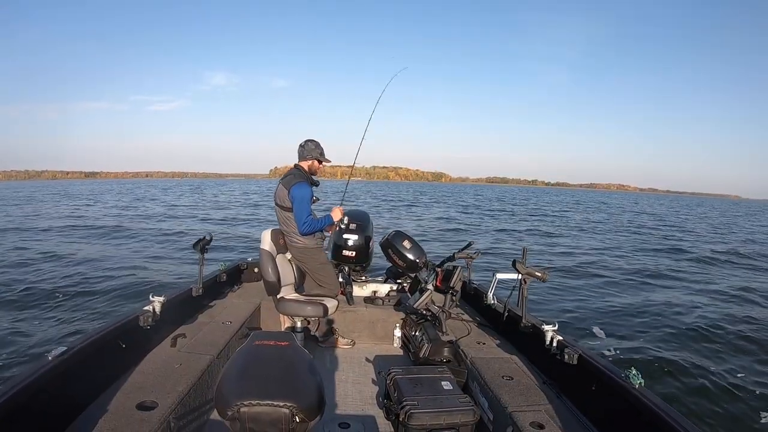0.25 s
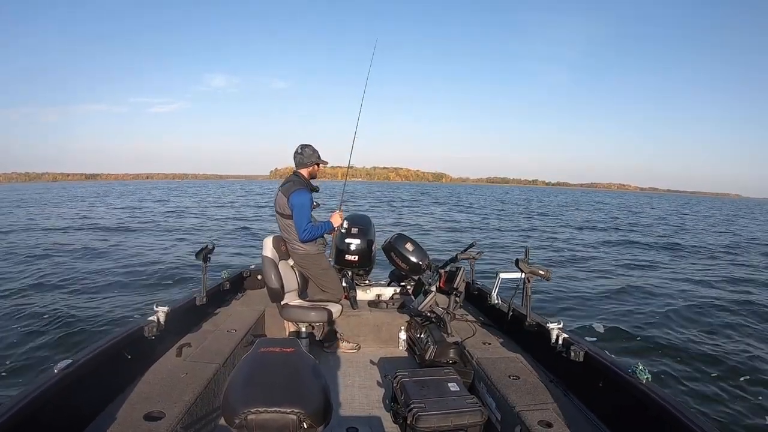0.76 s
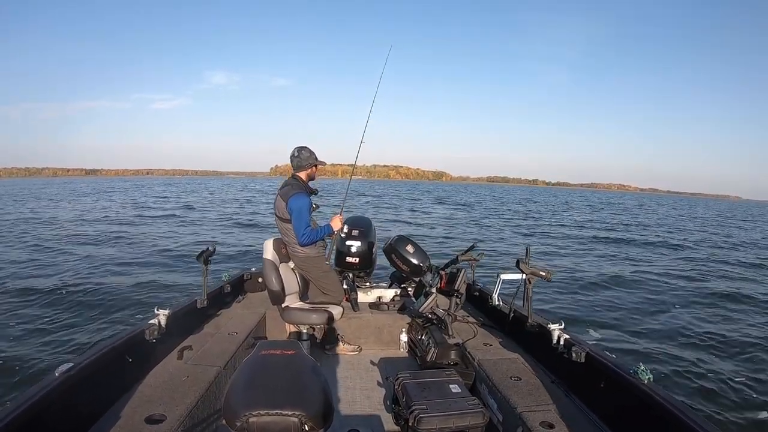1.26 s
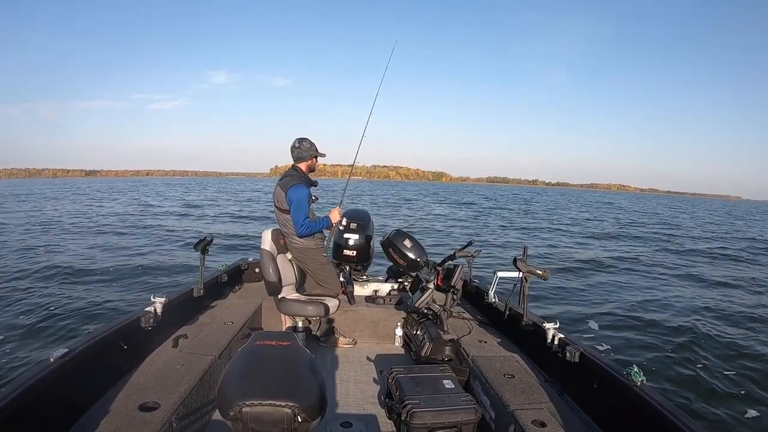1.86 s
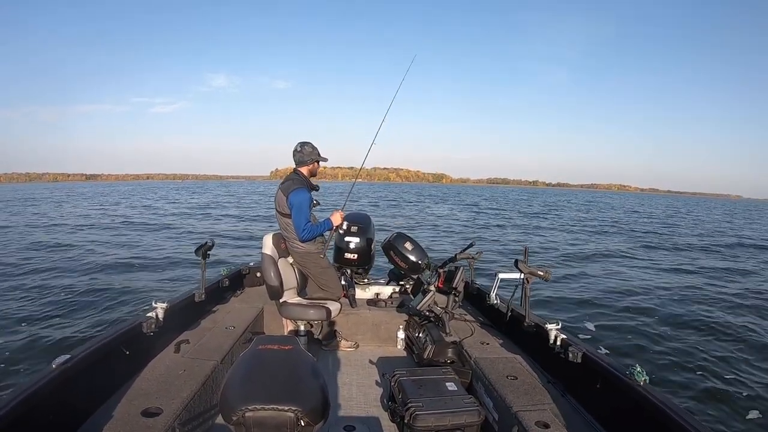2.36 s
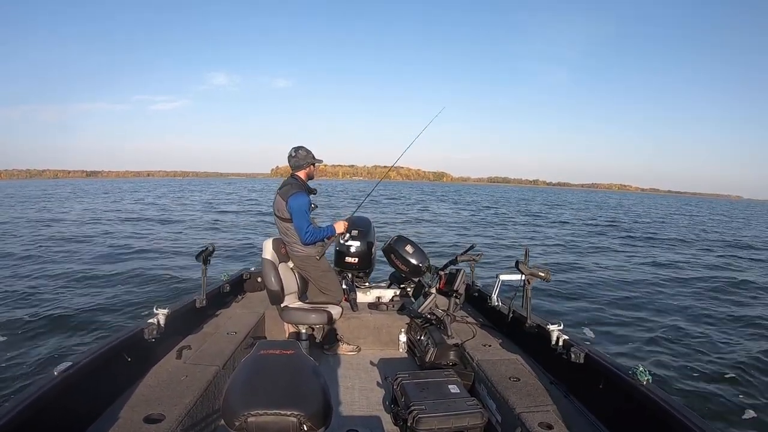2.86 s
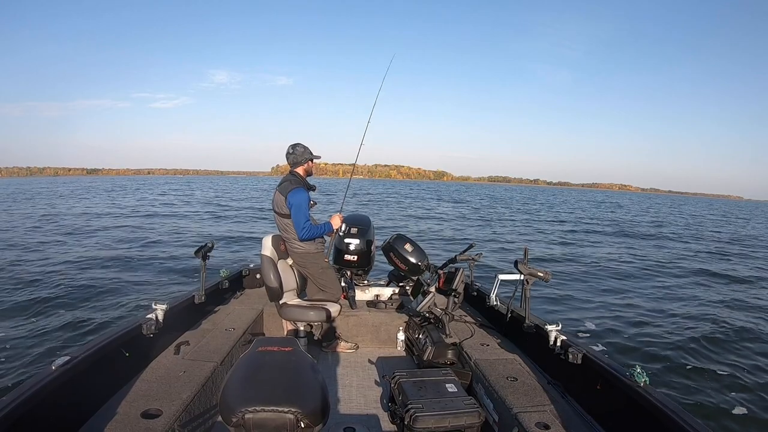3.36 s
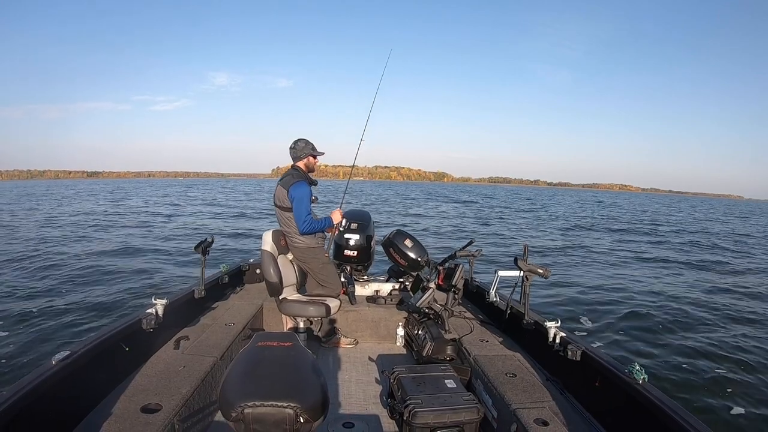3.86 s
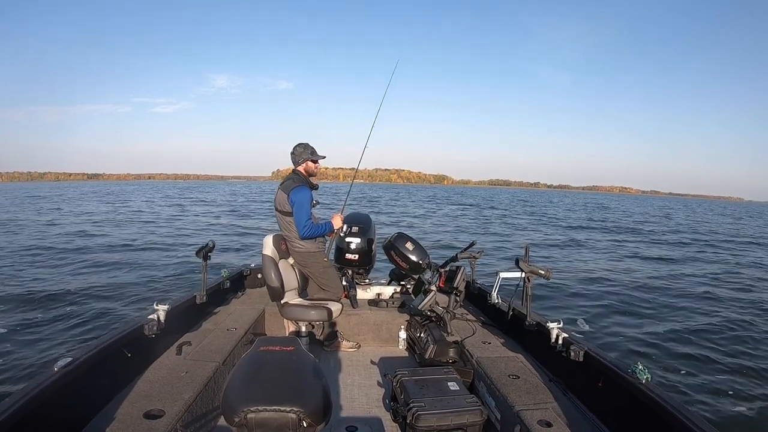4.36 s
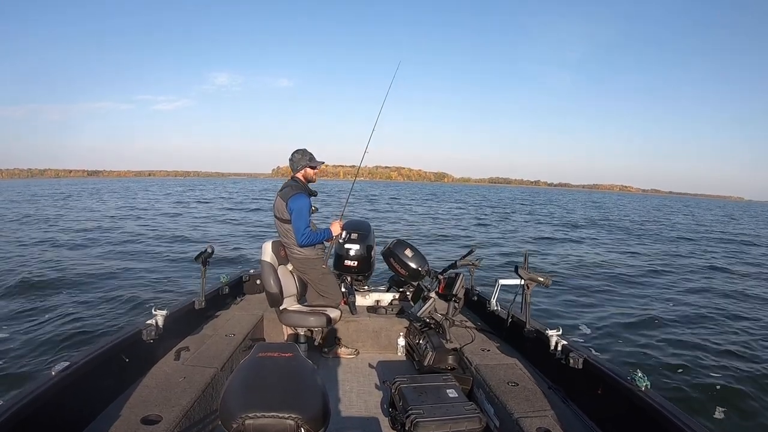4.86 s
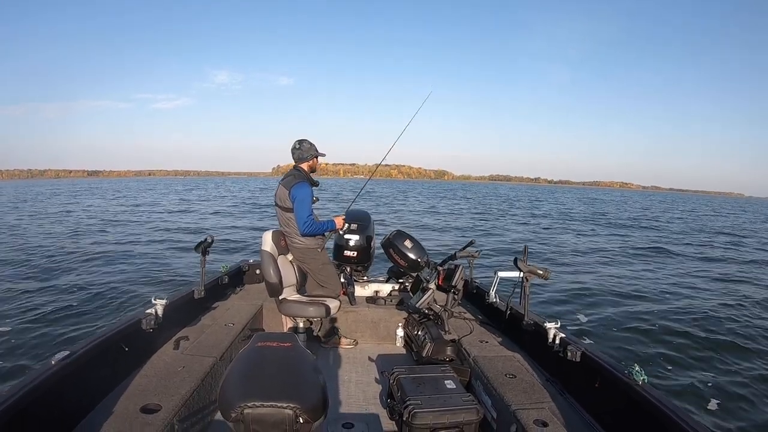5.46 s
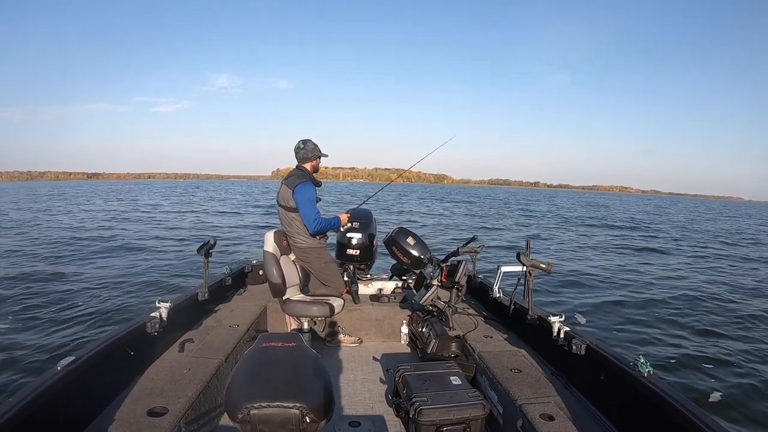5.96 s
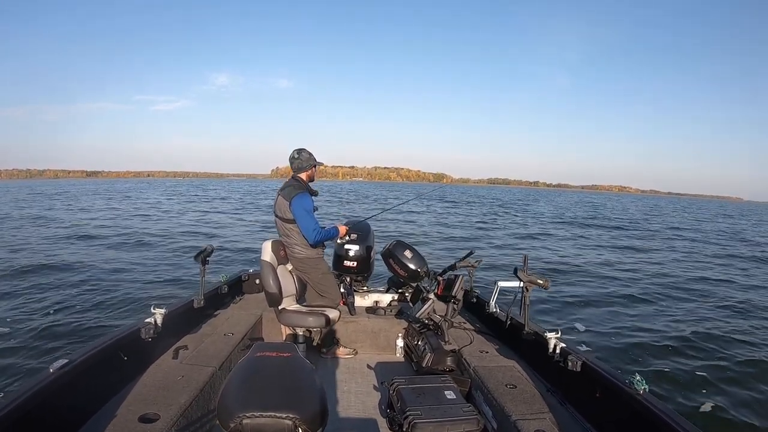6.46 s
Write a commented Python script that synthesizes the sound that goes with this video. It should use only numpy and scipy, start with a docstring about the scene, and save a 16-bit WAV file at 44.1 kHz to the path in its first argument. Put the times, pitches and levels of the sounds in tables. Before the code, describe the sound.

Wavelets lap a small fishing boat on an open lake: irregular wet slaps, hollow bubbling gulps, clucking ripples, tiny drips and faint foam fizz. Deep wind rumble buffets the microphone, strongest early and mostly fading. A cluster of tiny tackle clicks comes near the middle with a soft line swish, then two light knocks. The lapping turns busier again near six seconds. Close mono microphone on board, outdoors, almost no echo.

```python
"""Wavelets slap the hull of a small fishing boat adrift on a lake: bubble clouds, spray, crackle and thuds.
Trapped air gulps as wavering sine bubbles; ripples cluck, drops plink and spit, foam fizzes as shaped noise.
Resonators ring light knocks and clicking tackle; a grainy hiss is the swishing line.
Wind rumbles on the microphone as bands of noise that mostly die down, over a weak hum and the steady wash
of open water."""
import sys
import numpy as np
from scipy import signal
from scipy.fft import rfft, irfft
from scipy.io import wavfile
from scipy.ndimage import uniform_filter1d

SR = 44100
rng = np.random.default_rng(int(sys.argv[2]) if len(sys.argv) > 2 else 0)


def to_wav(sig):
    """Store sig (one row per channel, or 1-D mono) as 16-bit WAV at the path in sys.argv[1].

    Samples outside -1..1 are clipped; the rate is SR.
    """
    pcm = np.clip(np.atleast_2d(sig), -1, 1) * 32767
    pcm = np.round(pcm).astype(np.int16)
    wavfile.write(sys.argv[1], SR, pcm.T)  # frames by channels


N = 296219  # length in samples


def undb(db):
    """Decibels to gain."""
    return 10 ** (np.asarray(db) / 20)


def unit(x):
    """Scale to rms 1."""
    return x / (np.sqrt(np.mean(x ** 2)) + 1e-12)


def curve(rows):
    """The second column of a table, joined by straight lines over the time in the first."""
    times, values = np.transpose(rows)
    return np.interp(np.arange(N) / SR, times, values)


def add(out, s, x):
    """Mix x into out from time s."""
    i = min(max(int(s * SR), 0), len(out))
    out[i:i + len(x)] += x[:len(out) - i]


def envelope(swell, t60):
    """A rounded rise over swell seconds, then a fall of 60 dB over t60 seconds."""
    t = np.arange(int((swell + t60) * SR) + 2) / SR
    rise = np.sin(np.pi / 2 * np.minimum(t / swell, 1)) ** 2
    fall = np.exp(-np.log(1000) * np.maximum(t - swell, 0) / t60)
    return rise * fall


def wobble(size, hz):
    """A random wander: hz random points a second, joined by straight lines."""
    knots = rng.standard_normal(int(size * hz / SR) + 2)
    return np.interp(np.arange(size) * hz / SR, np.arange(len(knots)), knots)


def noise(points):
    """Noise of rms 1 whose spectrum follows (f/Hz, density/dB) points and falls away outside them."""
    hz, db = np.transpose(points)
    f = np.maximum(np.arange(N // 2 + 1) * SR / N, 1)
    gain = undb(np.interp(np.log(f), np.log(hz), db))
    gain *= np.minimum(f / hz[0], 1) * np.minimum(hz[-1] / f, 1) ** 2
    return unit(irfft(rfft(rng.standard_normal(N)) * gain, N))


def resonate(x, hz, width):
    """One resonance, gain 1 at its centre; its width is capped at SR / 4."""
    b, a = signal.iirpeak(hz, hz / min(width, SR / 4), fs=SR)
    return signal.lfilter(b, a, x)


def ring(x, modes):
    """A body with several resonances."""
    return sum(undb(db) * resonate(x, hz, width) for hz, width, db in modes)


def burst(t60, swell=0.00007):
    """A brief irregular contact, with silence after it for the ring."""
    shape = envelope(swell, t60)
    return np.pad(shape * rng.standard_normal(len(shape)), (0, SR // 20))


def bubble(hz, swell, t60, rise, wavers=False):
    """Trapped air rings; its pitch glides by up to rise octaves, and a pocket that deforms wavers."""
    settle_s, waver_hz, waver_octaves, waver_db = 0.0329, 90, 0.03675, 1.26
    shape = envelope(swell, t60)
    octaves = rise * (1 - np.exp(-np.arange(len(shape)) / SR / settle_s))
    if wavers:
        octaves = octaves + waver_octaves * wobble(len(shape), waver_hz)
        shape = shape * undb(waver_db * wobble(len(shape), waver_hz))
    return shape * np.sin(2 * np.pi * np.cumsum(hz * 2 ** octaves) / SR)


def froth(size, hz, rate, octaves, cycles, scatter_db, tilt):
    """A cloud of rate bubbles a second around one pitch, rms 1; small ones are fainter and shorter."""
    out = np.zeros(size)
    draws = rng.standard_normal((int(rate * size / SR) + 1, 4))
    for k, (when, pitch, loud, rise) in enumerate(draws):
        f = np.clip(hz * 2 ** (octaves * pitch), 220, 9000)
        gain = undb(scatter_db * min(loud, 2)) * min(hz / f, 1) ** tilt
        add(out, (k + when / 2) / rate, gain * bubble(f, 0.97 / f, cycles / f, 0.15 + 0.13 * rise))
    return unit(out)


# wavelets breaking on the hull: [t/s, bubble rush level/dB, middle bubble f/Hz, t60/s]
HULL_SLAPS = [(.005, -48.5, 624, 0.22), (.04, -59.5, 1580, 0.16), (.33, -51.5, 1190, 0.14),
              (.36, -47.5, 790, 0.21), (.402, -54, 790, 0.1), (0.469, -52, 766, 0.087),
              (.672, -54.5, 960, 0.19), (.697, -51, 1100, 0.13), (.738, -42, 478, 0.08),
              (1.04, -62, 970, 0.094), (1.099, -61, 523, 0.3), (1.27, -60, 603, 0.22),
              (1.448, -53, 890, 0.15), (1.53, -67, 905, 0.15), (1.925, -72, 950, 0.13),
              (1.969, -59, 680, 0.38), (2.211, -58, 765, 0.25), (2.53, -53, 610, 0.19),
              (2.567, -50.5, 573, .2), (2.615, -61, 1150, 0.22), (2.664, -48.5, 940, 0.25),
              (2.708, -39, 630, 0.13), (2.898, -58, 900, 0.14), (2.942, -55.5, 676, 0.2),
              (2.995, -56, 835, 0.2), (3.042, -57, 690, 0.24), (3.844, -59.5, 564, 0.27),
              (4.21, -56.5, 796, 0.055), (4.544, -49, 720, 0.15), (4.597, -51, 533, 0.56),
              (4.673, -55.5, 980, 0.1), (5.011, -57, 462, 0.9), (5.305, -54, 570, 0.18),
              (5.868, -50.5, 1540, 0.16), (5.89, -50.5, 1200, 0.37), (5.938, -45.5, 636, 0.45),
              (5.977, -46.5, 417, 0.4), (6.05, -47, 650, 0.16), (6.088, -48, 400, 0.19),
              (6.46, -62, 920, 0.13), (6.52, -55, 680, 0.21), (6.588, -52, 860, 0.093)]


def slaps(swell_s=0.01, spray_db=-18, spray_hz=2100, thud_db=-11, crackle_db=-9, crackle_hz=1300):
    """A wavelet folds into a rush of bubbles, crackles as its film tears, throws droplets and thuds."""
    out = np.zeros(N)
    thud = noise([(110, -35.0), (170, 12.0), (260, 7.0), (420, -29), (700, -52.0)])
    for s, db, hz, t60 in HULL_SLAPS:
        shape = envelope(swell_s, t60)
        size = len(shape)
        rush = froth(size, hz, rate=750, octaves=0.65, cycles=18, scatter_db=4.5, tilt=0.75)
        spray = froth(size, spray_hz, rate=300, octaves=0.6, cycles=22, scatter_db=7, tilt=0.8)
        crackle = froth(size, crackle_hz, rate=220, octaves=0.55, cycles=4, scatter_db=6, tilt=0.6)
        # heavier, lower-pitched waves push the hull harder; lighter ones crackle more
        weight = 650 / hz
        push = undb(thud_db) * weight * np.resize(np.roll(thud, int(s * SR)), size)
        slap = rush + undb(spray_db) * spray + undb(crackle_db) / weight * crackle + push
        add(out, s, undb(db) * shape * slap)
    return out


# air pockets closing at the hull:
# [t/s, peak level/dB before trim and waver, starting f/Hz, t60/s, pitch rise/octaves]
AIR_POCKETS = [(.088, -45.5, 784, 0.076, 1.1), (.091, -36, 451, 0.076, 0.46), (.124, -41, 543, 0.069, 0.37),
               (0.127, -50, 920, 0.061, 1.2), (.347, -42.5, 1400, 0.027, 1),
               (.394, -35.5, 1074, 0.02, 0.71), (.366, -49, 760, 0.023, -1), (.578, -50.5, 576, 0.19, 0),
               (0.62, -33.5, 365, 0.13, 0.18), (0.675, -41, 1346, 0.011, 0),
               (.684, -44.5, 745, 0.063, 0.14), (0.701, -50, 1550, .02, 3.2), (.746, -24, 266, 0.059, 0.63),
               (.768, -38, 335, 0.08, 0.82), (0.835, -42, 277, 0.062, 0.3),
               (1.052, -46.5, 992, 0.033, 0.034), (1.1, -44, 584, 0.027, 1.6), (1.115, -42, 380, 0.02, 2.3),
               (1.132, -42, 426, 0.037, 0), (1.155, -39.5, 285, 0.061, 0.17),
               (1.211, -40.5, 545, 0.068, 0.39), (1.274, -47.5, 476, 0.081, -0.5),
               (1.229, -51, 794, 0.074, 2.6), (1.34, -47, 686, 0.082, 0.13),
               (1.462, -34.5, 667, 0.035, 0.24), (1.465, -38.5, 450, 0.096, 0.24),
               (1.644, -44.5, 649, 0.068, 0.17), (1.816, -52, 744, 0.12, 0.054),
               (1.984, -45, 350, 0.022, -0.7), (2.22, -49.5, 1234, 0.048, 0),
               (2.498, -39.5, 340, 0.12, 0.27), (2.54, -49, 446, 0.037, 1.6), (2.584, -42, 605, 0.019, 0.4),
               (2.636, -47, 1162, 0.034, 0.036), (2.677, -56, 990, .03, 1), (2.696, -35, 790, 0.045, 0.42),
               (2.711, -31, 886, 0.021, 1.2), (2.718, -33, 427, 0.051, 0.3), (2.727, -41, 713, 0.043, 0.7),
               (2.904, -53, 455, 0.079, -0.6), (2.946, -47, 492, 0.066, 0), (2.958, -46, 665, 0.036, 0.5),
               (2.975, -47, 780, 0.0274, 0), (2.997, -45, 640, 0.046, 0.13), (3.011, -37, 700, 0.027, 0.72),
               (3.016, -42.5, 1104, 0.034, 0), (3.048, -38, 640, 0.029, 0), (3.062, -46.5, 414, 0.13, -0.4),
               (3.085, -39, 547, 0.095, 0.81), (3.708, -54, 1230, 0.028, 0.22),
               (3.712, -40.5, 520, 0.06, 0.43), (3.98, -54, 473, 0.13, 0.47),
               (4.229, -40, 497, 0.12, 0.013), (4.433, -44.5, 930, 0.017, 0.9),
               (4.455, -50.5, 1360, 0.039, 0), (4.459, -45, 720, 0.071, 0),
               (4.555, -46.5, 996, 0.075, 0.38), (4.602, -39, 328, 0.012, 0.25),
               (4.689, -30.5, 786, 0.0084, 1.2), (4.771, -49, 597, 0.058, 0.12),
               (4.886, -44.5, 448, 0.069, 0), (4.913, -37.5, 296, 0.12, 0.25), (5.339, -41, 588, 0.085, 0),
               (5.918, -45.5, 1044, 0.087, 0), (5.945, -33.5, 327, 0.11, 0.5),
               (5.971, -37, 520, 0.059, 0.36), (5.98, -39.5, 610, 0.1, 0.075),
               (6.004, -29.5, 425, 0.016, 0), (6.052, -39.5, 890, 0.048, 0.68),
               (6.061, -30, 631, 0.026, 0.23), (6.068, -36.5, 464, 0.12, 0), (6.08, -40, 705, .04, 0.37),
               (6.408, -52, 888, 0.16, 0.29), (6.47, -38.5, 730, 0.045, 0.25),
               (6.485, -42.5, 590, 0.06, 0.85), (6.501, -40, 803, 0.058, 0), (6.518, -27, 736, 0.085, 0.23),
               (6.539, -38.5, 495, 0.048, 0.5), (6.564, -39, 620, 0.089, 0.13)]


def gulps(trim_db=-0.63, split_db=-15, swell_cycles=2.01):
    """Air is shut in between wave and hull; large pockets build up slowly, each sheds two smaller bubbles."""
    out = np.zeros(N)
    for s, db, hz, t60, rise in AIR_POCKETS:
        gain, swell = undb(db + trim_db), swell_cycles / hz
        add(out, s, gain * bubble(hz, swell, t60, rise, wavers=True))
        for lag, pitch in rng.random((2, 2)):
            small = bubble(hz * 2 ** (0.6 * pitch), swell / 2, t60 / 3, 0)
            add(out, s + lag * t60 / 4, gain * undb(split_db) * small)
    return out


def stirred(laps, calm_db=-67, stir_db=-12, settle_s=0.59):
    """Gain of the ripples: the energy of the laps lingers in the water and settles to a calm level."""
    keep = np.exp(-1 / (settle_s * SR))
    energy = signal.lfilter([1 - keep], [1, -keep], laps ** 2)
    return np.sqrt(undb(calm_db) ** 2 + undb(stir_db) ** 2 * energy)


def ripples(laps, drip_db=-13):
    """Small bubbles cluck along the waterline and drips tinkle between them, stirred up by the laps."""
    clucks = froth(N, 520, rate=110, octaves=0.5, cycles=18, scatter_db=5, tilt=0.7)
    tinkle = froth(N, 2000, rate=30, octaves=0.7, cycles=20, scatter_db=6, tilt=0.5)
    return (clucks + undb(drip_db) * tinkle) * stirred(laps)


# drops falling back on the water: [t/s, main bubble peak level/dB, starting f/Hz, t60/s]
FALLING_DROPS = [(0.478, -50.5, 2880, 0.06), (0.507, -53.5, 2450, 0.046), (.513, -58.5, 1680, .04),
                 (0.639, -55.5, 2240, 0.026), (.652, -56, 1340, .04), (0.721, -50, 2190, .03),
                 (.767, -66, 2170, .02), (.797, -61, 1400, 0.054), (1.221, -55.5, 4470, 0.036),
                 (1.297, -63, 3300, .025), (1.464, -55, 2210, .04), (1.754, -59, 1970, 0.015),
                 (1.829, -59, 2060, .03), (2.857, -52.5, 1160, 0.048), (2.917, -53, 1150, 0.039),
                 (3.052, -58, 2870, .025), (3.498, -59.5, 3200, .03), (3.597, -60.5, 1540, .03),
                 (3.678, -60, 3900, .025), (3.692, -58, 3080, 0.02), (3.717, -61, 4080, .025),
                 (4.182, -59, 3180, 0.022), (4.543, -58, 4080, 0.024), (4.58, -53.5, 2490, .027),
                 (4.624, -63, 3020, .02), (4.768, -61, 3320, .02), (4.87, -58, 3280, 0.02),
                 (5.282, -59.5, 5900, .025), (5.405, -57.5, 1050, .03), (6.283, -60.5, 2240, 0.035),
                 (6.349, -55, 4280, .025), (6.371, -52, 2900, 0.044), (6.398, -56, 4900, .025),
                 (6.464, -47.5, 5010, 0.026), (6.524, -53, 2190, 0.027), (6.562, -58, 2680, .025)]


def drips(splash_db=-13, satellite_db=-8, rise=0.13):
    """Each drop splashes, rings one bubble and sheds a few smaller ones just after it."""
    out = np.zeros(N)
    for s, db, hz, t60 in FALLING_DROPS:
        gain = undb(db)
        add(out, s, gain * bubble(hz, 0.0028, t60, rise))
        add(out, s, gain * undb(splash_db) * resonate(burst(t60), hz, hz))
        for lag, pitch in rng.standard_normal((3, 2)):
            satellite = bubble(hz * 2 ** (0.2 * pitch), 0.001, t60 / 2, rise)
            add(out, s + abs(lag) * t60 / 4, gain * undb(satellite_db) * satellite)
    return out


# the heavier drops: [t/s, peak level/dB, f/Hz]
HEAVY_DROPS = [(0.347, -45, 4820), (0.703, -54, 2100), (0.743, -52, 1835), (1.337, -50.5, 1700),
               (1.9737, -46.5, 3400), (2.571, -47, 2070), (2.819, -44, 2400), (2.936, -43, 2470),
               (2.998, -41, 2200), (0.677, -59, 1300), (1.103, -56, 2200), (1.462, -48, 2300),
               (1.872, -53, 1800), (2.216, -58, 1500), (3.827, -53.5, 2200), (4.219, -53, 1900),
               (4.457, -48.5, 1810), (4.56, -45.5, 2750), (4.693, -39.5, 2420), (6.315, -45, 2886),
               (6.346, -42, 4540), (6.473, -50, 2150), (6.596, -51, 1693), (6.5188, -44, 2260)]


def spits(t60_s=0.024, width=0.6):
    """Drops land and bubbles burst with a short wet tick: noise through a narrow and a broad resonance."""
    out = np.zeros(N)
    for s, db, hz in HEAVY_DROPS:
        tick = resonate(burst(t60_s), hz, width * hz)
        tick = resonate(tick, hz, 9.2 * hz)
        add(out, s, undb(db) * tick / np.abs(tick).max())
    return out


# crests spilling into foam beside the boat:
# [t/s at the height, fizz level/dB, swell/s, t60/s, brightness/dB per octave]
SPILLING_CRESTS = [(0.049, -62.5, 0.052, 3.2, -3), (1.45, -67.5, 0.29, 0.9, -3),
                   (2.68, -63.5, 0.35, 2.9, -3), (3.03, -63, 0.12, 2.2, -4.5),
                   (4.588, -70.5, 0.12, 2.3, -3), (5.62, -65, 0.31, 8.7, -3),
                   (5.92, -63.5, 0.11, 0.64, -2.5), (6.18, -66.5, 0.19, 2.7, 0),
                   (6.525, -61, 0.046, 0.12, 1)]
# spectrum of bursting foam, before each crest's brightness: [f/Hz, density/dB per Hz]
FOAM_SPECTRUM = [(900, 7), (1500, -8), (1900, 6), (3300, 4), (5500, 4.5), (9000, 1.5), (15000, -2)]


def foam(calm_db=-80, pops_db=-5, grain_db=3):
    """Each crest builds up a fizz with separate pops that dies away; a little foam is always there."""
    out = undb(calm_db) * noise(FOAM_SPECTRUM)
    pops = undb(pops_db) * froth(N, 1800, rate=130, octaves=0.7, cycles=12, scatter_db=6, tilt=0.4)
    for s, db, swell, t60, tilt in SPILLING_CRESTS:
        shape = envelope(swell, t60)[:N]
        spectrum = [(hz, level + tilt * np.log2(hz)) for hz, level in FOAM_SPECTRUM]
        fizz = noise(spectrum) + np.roll(pops, int(s * SR))
        add(out, s - swell, undb(db) * shape * fizz[:len(shape)])
    # a random level for every 64 samples makes the fizz grainy
    grain = np.repeat(undb(grain_db * rng.standard_normal(N // 64 + 1)), 64)[:N]
    return out * unit(grain)


# swells bumping the underside of the hull: [t/s, rms level/dB at the height, f/Hz, t60/s]
HULL_BUMPS = [(.36, -38.5, 230, .12), (1.995, -42, 136, 0.18), (2.208, -42.5, 125, 0.22),
              (2.712, -36, 172, 0.094), (3.152, -44.5, 140, .05), (5.951, -41, 169, .2),
              (6.06, -38.5, 174, .16), (6.316, -37, 99, .22)]


def thuds(swell_s=0.0059, width=0.83):
    """A swell meets the hull from below with a dull, brief boom of resonant noise."""
    out = np.zeros(N)
    for s, db, hz, t60 in HULL_BUMPS:
        shape = envelope(swell_s, t60)
        boom = resonate(rng.standard_normal(SR), hz, width * hz)
        boom = resonate(boom, hz, width * hz)
        add(out, s, undb(db) * shape * unit(boom[-len(shape):]))
    return out


# light knocks on the boat: [t/s, peak level/dB, rattle t60/s, contact cutoff f/Hz]
LIGHT_KNOCKS = [(4.319, -43.5, .004, 3500), (5.074, -35.5, .04, 8400)]
# modes of the knocked panel: [f/Hz, width/Hz, level/dB]
PANEL_MODES = [(1020, 270, 13), (1430, 140, 19), (1590, 99, 9), (3280, 580, 4), (4340, 720, 2),
               (8000, 300, 4)]


def knocks():
    """Light blows on a panel of the boat; a softer contact rings fewer of its high modes."""
    out = np.zeros(N)
    for s, db, t60, hz in LIGHT_KNOCKS:
        softness = signal.butter(4, hz, fs=SR, output="sos")
        contact = signal.sosfilt(softness, burst(t60, swell=t60 / 10))
        knock = ring(contact, PANEL_MODES)
        add(out, s, undb(db) * knock / np.abs(knock).max())
    return out


def hull(x, t60=0.052, echo_db=-17.02, low_hz=450, dull_hz=3000):
    """Hull sides and deck scatter the sound into a brief, dull tail; long waves bend past them."""
    band = signal.butter(1, [low_hz, dull_hz], "band", fs=SR, output="sos")
    tail = signal.sosfilt(band, burst(t60, swell=0.0053))
    tail /= np.linalg.norm(tail)
    return x + undb(echo_db) * signal.fftconvolve(x, tail)[:N]


# clicks of rod, reel and line: [t/s, peak level/dB before the high-pass, contact f/Hz, contact t60/s]
TACKLE_CLICKS = [(2.519, -39.5, 10200, 0.0044), (2.557, -34.5, 8460, 0.0052), (2.565, -32.5, 8400, 0.0057),
                 (2.692, -48, 13000, 0.038), (2.776, -50.5, 14000, 0.13), (2.805, -38.5, 6600, 0.014),
                 (2.809, -43, 14000, 0.06), (2.819, -35.5, 11500, 0.013), (2.878, -42.5, 11300, 0.023),
                 (2.906, -46.5, 6900, 0.186), (2.933, -38, 14000, 0.039), (2.938, -29, 14500, 0.009),
                 (2.976, -34.5, 7500, 0.031), (5.74, -49, 14300, 0.098), (5.752, -39, 14300, 0.017),
                 (5.753, -47, 3950, 0.027), (2.997, -41.5, 5140, 0.016)]
# modes of the tackle, before the ring gain: [f/Hz, width/Hz, level/dB]
TACKLE_MODES = [(5380, 1900, 2.5), (8300, 760, 2), (12500, 53, -3), (13300, 93, -2), (13440, 55, -4),
                (15100, 120, 2)]


def tackle(width=0.24, ring_db=6, swell_s=0.00025):
    """Small hard parts click and ring for a moment, with the lows filtered away."""
    out = np.zeros(N)
    for s, db, hz, t60 in TACKLE_CLICKS:
        contact = resonate(burst(t60, swell_s), hz, width * hz)
        click = contact + undb(ring_db) * ring(contact, TACKLE_MODES)
        add(out, s, undb(db) * click / np.abs(click).max())
    return signal.sosfilt(signal.butter(2, 3000, "high", fs=SR, output="sos"), out)


# the line swishing as the rod is lifted: [t/s at the height, level/dB, swell/s, t60/s]
ROD_LIFTS = [(.24, -61.5, .17, 0.29), (2.85, -66, 0.32, 1), (3.19, -61.5, 0.14, 0.49)]
# spectrum of the swish: [f/Hz, density/dB per Hz]
SWISH_SPECTRUM = [(1000, -6), (1600, 0), (1880, 12.5), (2200, 2), (3300, -2), (4500, 0), (5800, .5),
                  (8500, -8), (12000, -8), (15000, -15)]


def swishes(grain_db=2):
    """A soft, grainy hiss swells with each lift of the rod."""
    strength = np.zeros(N)
    for s, db, swell, t60 in ROD_LIFTS:
        add(strength, s - swell, undb(db) * envelope(swell, t60))
    hiss = noise(SWISH_SPECTRUM) * undb(grain_db * wobble(N, 400))
    return strength * unit(hiss)


def gust(points, db, span):
    """Eddies on the microphone, evened out over span seconds, then as strong as the gust carrying them."""
    eddies = noise(points)
    power = np.abs(signal.hilbert(eddies)) ** 2 / 2
    strength = uniform_filter1d(power, int(span * SR))
    return eddies / np.sqrt(strength) * undb(db)


# gusts on the microphone: [t/s, rumble level/dB before trim]
GUST_LEVELS = [(0, -29.0), (0.55, -36.5), (0.75, -31.5), (0.9, -30.5), (1.2, -26.0), (1.5, -27.0),
               (1.7, -34.5), (1.95, -29.5), (2.45, -32.5), (2.75, -31.0), (2.87, -37.0), (3.17, -26.0),
               (3.4, -38.0), (3.8, -34.5), (4.05, -33.5), (4.18, -45.5), (4.3, -38.0), (4.45, -51.0),
               (4.75, -45.0), (5.03, -46.5), (5.13, -36.0), (5.35, -37.5), (5.47, -44.5), (6.05, -41.0),
               (6.25, -53.0), (6.42, -47.0), (6.58, -28.5), (6.7, -38.0)]
# spectrum of the large, slow eddies: [f/Hz, density/dB per Hz]
RUMBLE_SPECTRUM = [(14, -10), (22, 0), (36, 0), (44, -4), (52, -15), (90, -40), (140, -60)]
# the smaller eddies as the breeze drops: [t/s, buffeting level/dB before trim]
BUFFET_LEVELS = [(0, -35.0), (0.23, -32.0), (0.55, -39.0), (1.02, -32.5), (1.15, -40.5), (1.33, -33.5),
                 (1.8, -42.0), (1.98, -33.5), (2.12, -42.5), (2.3, -39.5), (2.42, -50.0), (2.6, -42.0),
                 (2.95, -49.5), (3.2, -44.5), (3.5, -48.0), (4.05, -46.5), (4.2, -51.0), (4.5, -54.0),
                 (4.78, -58.5), (4.95, -50.0), (5.35, -44.0), (5.6, -50.5), (6, -54.5), (6.25, -51.5),
                 (6.62, -46), (6.7, -46)]
# spectrum of the buffeting: [f/Hz, density/dB per Hz]
BUFFET_SPECTRUM = [(36, -18), (46, -0.5), (60, 5), (76, 0), (92, -12.5), (120, -25.5), (170, -31)]
# the smallest eddies: [t/s, flutter level/dB before the puffs]
FLUTTER_LEVELS = [(0, -36), (.15, -46), (.26, -45), (.45, -42.5), (.65, -44.5), (.85, -48.5), (1.05, -49),
                  (1.4, -54.5), (1.8, -62), (2.02, -49.5), (2.29, -59), (2.45, -53), (2.87, -60.5),
                  (3.25, -55.5), (3.85, -54), (4.02, -59), (4.2, -54.5), (4.7, -55.5), (5.25, -56),
                  (5.6, -64), (6.05, -50), (6.25, -60.5), (6.7, -49.5)]
# spectrum of the flutter: [f/Hz, density/dB per Hz]
FLUTTER_SPECTRUM = [(70, -15.5), (105, 3), (150, -6), (220, -12), (400, -31.5), (900, -50)]


def wind(rumble_trim_db=1.0, buffet_trim_db=-2.0, sway_db=-24.5, sway_fall_db_per_s=1.5):
    """Large eddies sway and rumble; smaller ones buffet and flutter above them, the flutter in puffs."""
    sway_level = sway_db - sway_fall_db_per_s * np.arange(N) / SR
    sway = undb(sway_level) * noise([(4, -2), (11, 2), (16, -1), (21, -25)])
    rumble = gust(RUMBLE_SPECTRUM, curve(GUST_LEVELS) + rumble_trim_db, span=0.14)
    buffet = gust(BUFFET_SPECTRUM, curve(BUFFET_LEVELS) + buffet_trim_db, span=0.12)
    puffs_db = 1.2 * wobble(N, 16)
    flutter = gust(FLUTTER_SPECTRUM, curve(FLUTTER_LEVELS) + puffs_db, span=0.16)
    return sway + rumble + buffet + flutter


def hum(hz=134.6, level_db=-64.5, waver_db=3, drift=0.0542):
    """A weak low sine tone, unsteady in level and pitch; drift is its rms share of the pitch."""
    waver = noise([(1, 19.0), (12, 5.0), (25, -24.5)])
    pitch = hz * (1 + drift * noise([(0.5, -5.5), (2, -8), (5, -26.5)]))
    tone = np.sqrt(2) * np.sin(2 * np.pi * np.cumsum(pitch) / SR)  # rms 1
    return undb(level_db + waver_db * waver) * tone


# spectrum of open water and still air: [f/Hz, density/dB per Hz]
WASH_SPECTRUM = [(60, -2.5), (115, 0), (145, 4.5), (180, -4), (260, -4), (400, -12), (620, -14), (900, -25),
                 (1400, -24.5), (2000, -24.5), (3200, -27), (8000, -29.5), (14000, -31.5), (16000, -36.5)]


def wash(level_db=-59):
    """Open water and still air blend into a steady bed of shaped noise."""
    return undb(level_db) * noise(WASH_SPECTRUM)


def scene():
    """Water and boat sounds close by, the lake behind, wind on top."""
    laps = slaps()
    close = hull(laps + gulps() + ripples(laps) + drips() + spits() + foam() + knocks())
    mix = close + thuds() + tackle() + swishes() + wind() + hum() + wash()
    return mix[None]  # one channel


def record(dry, top_hz=15900):
    """A steep low-pass takes away the highest treble."""
    return signal.sosfilt(signal.ellip(10, 0.2, 80, top_hz, fs=SR, output="sos"), dry)


dry = scene()
out = record(dry)
to_wav(out)
```